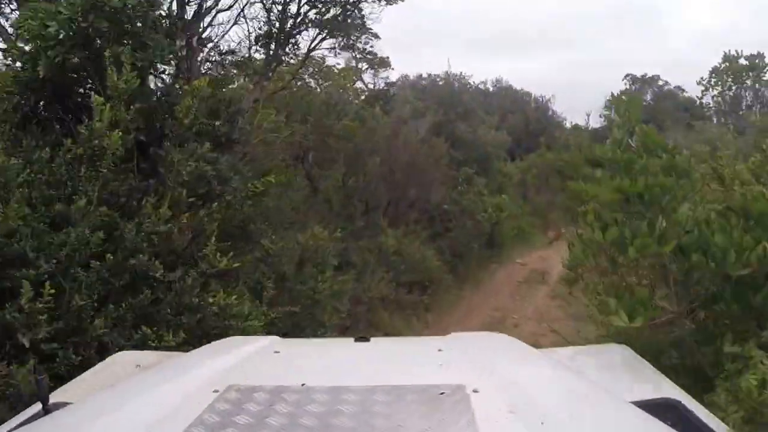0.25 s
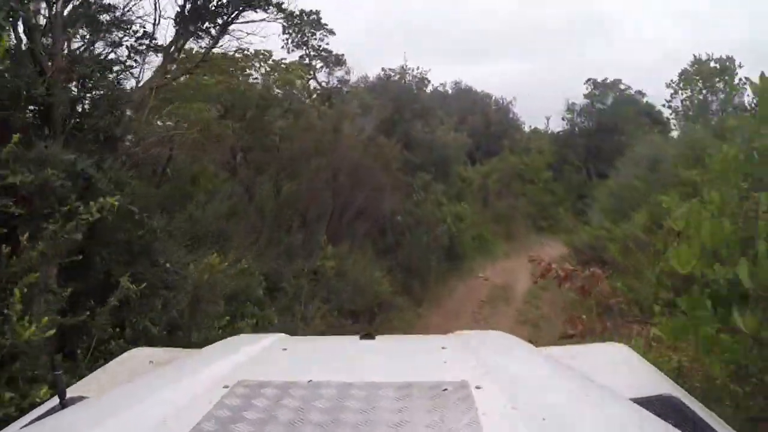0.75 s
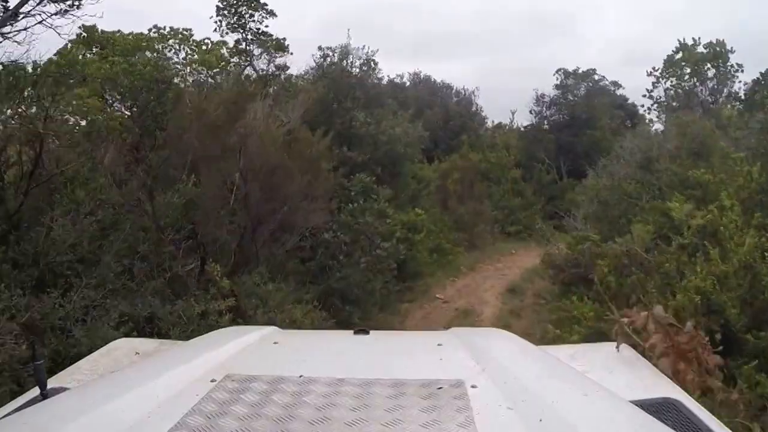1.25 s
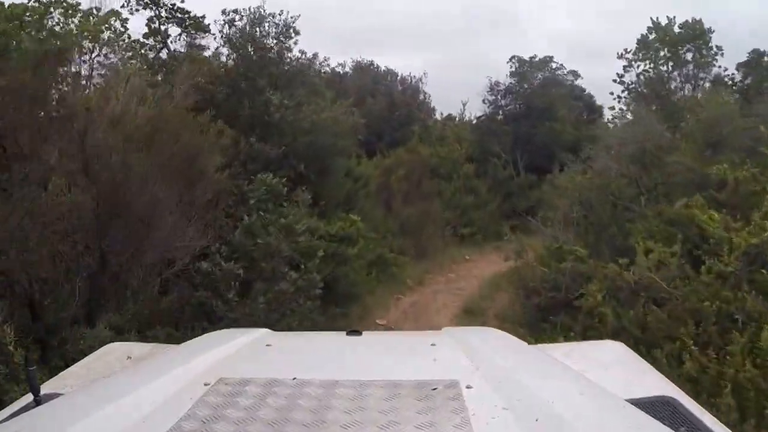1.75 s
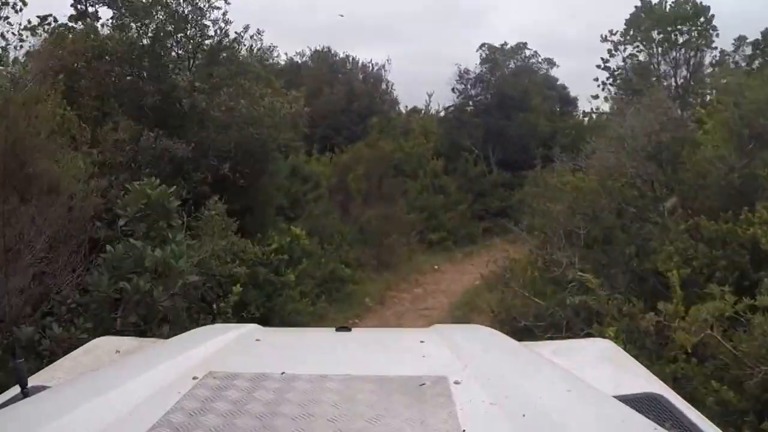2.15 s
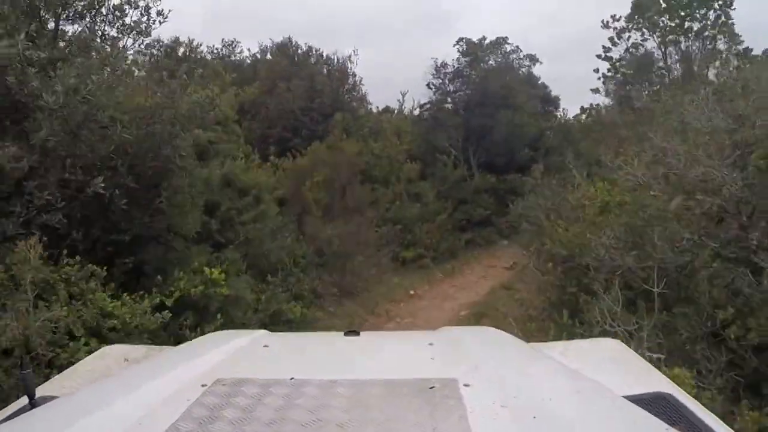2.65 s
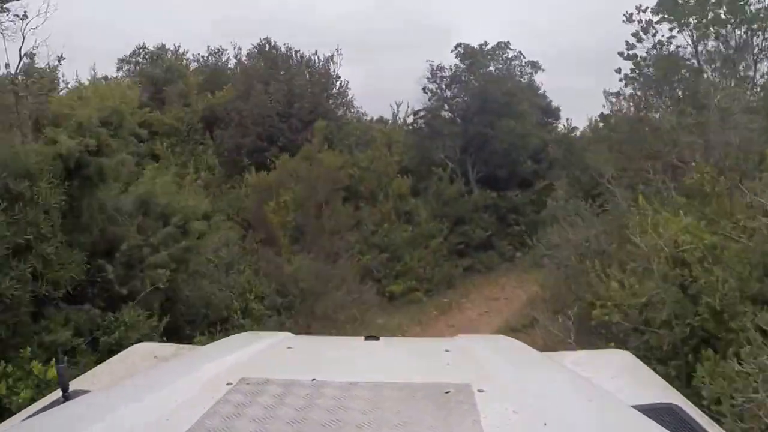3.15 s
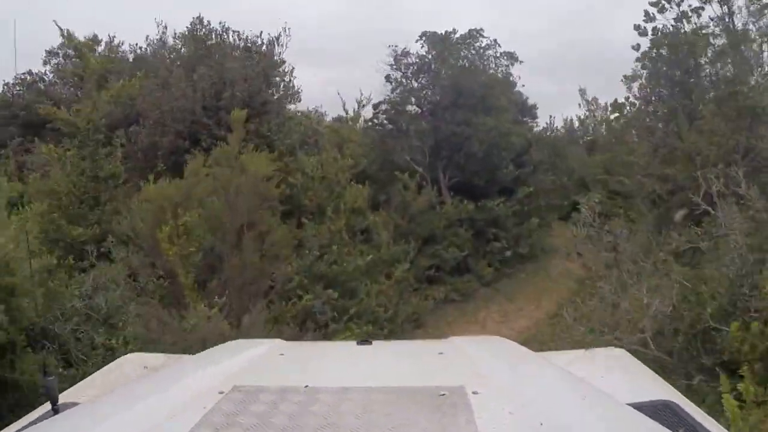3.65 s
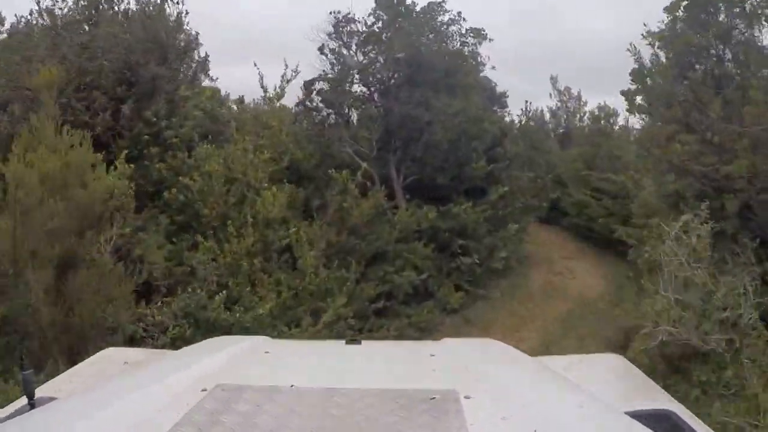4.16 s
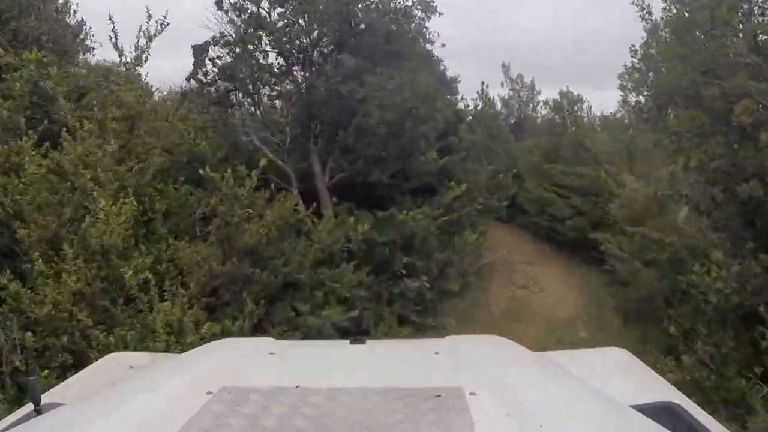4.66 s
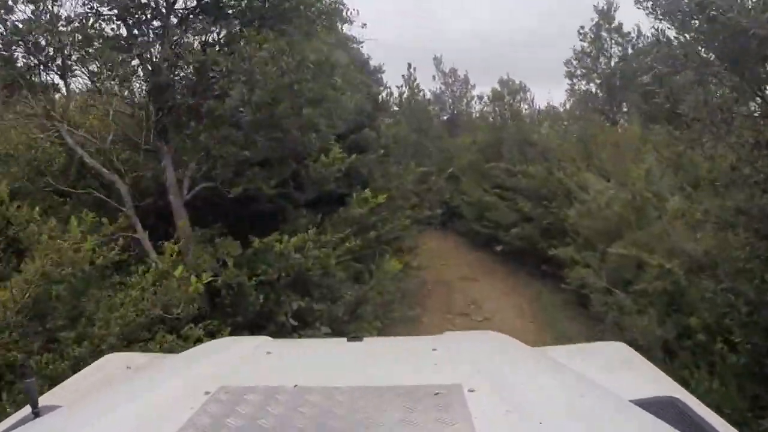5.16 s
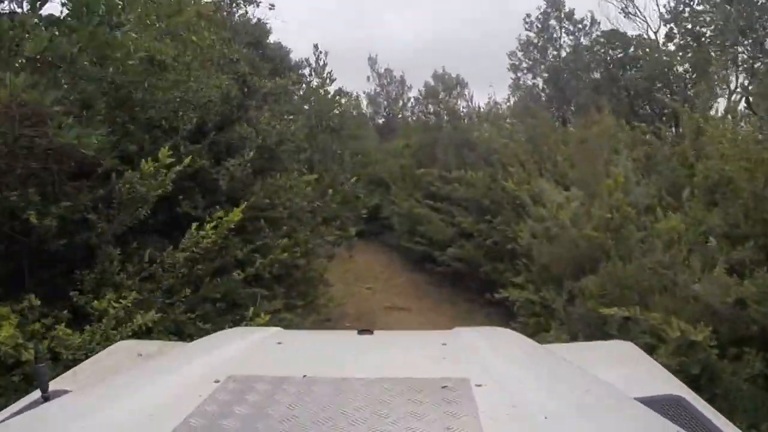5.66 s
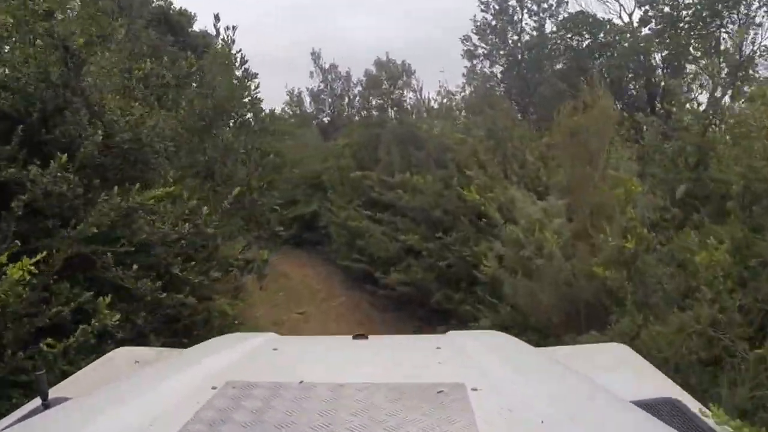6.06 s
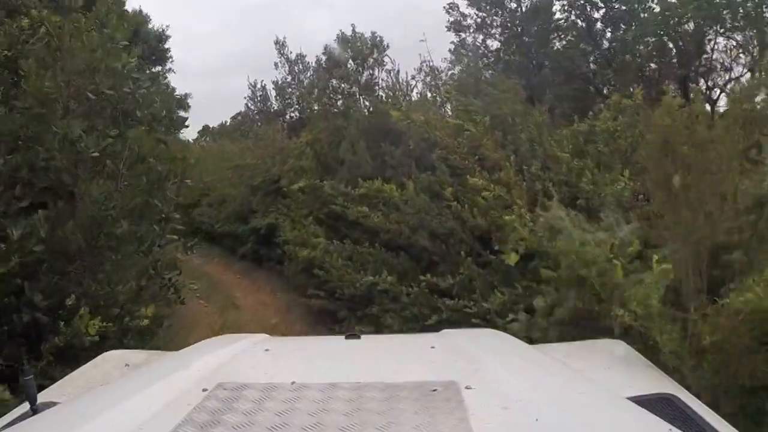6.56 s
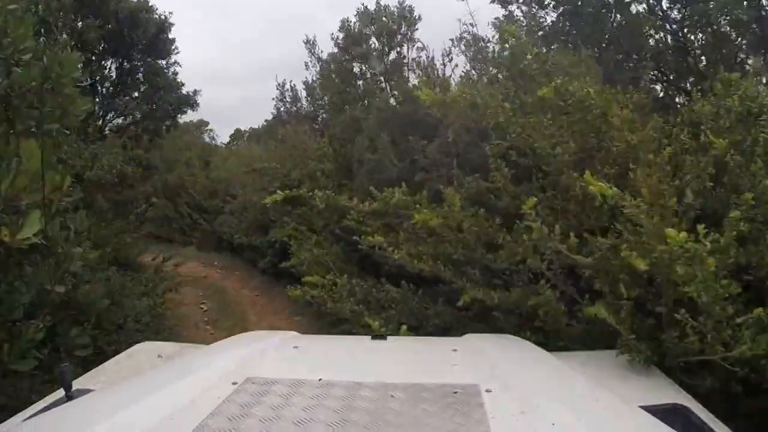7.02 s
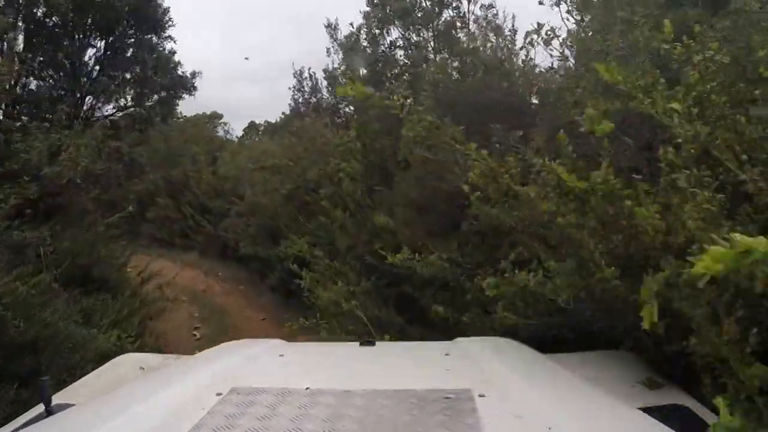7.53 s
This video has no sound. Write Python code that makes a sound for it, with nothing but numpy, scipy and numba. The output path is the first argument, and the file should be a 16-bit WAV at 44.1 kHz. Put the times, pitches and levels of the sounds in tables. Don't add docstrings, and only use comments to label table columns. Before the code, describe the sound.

Close, body-mounted sound of a diesel four-wheel-drive on an overgrown dirt track. A low engine hum and rumbling, rattling frame continue throughout. Dense twig cracks, hollow panel booms and dry scrapes crowd the first three seconds, then lighter brushing, tiny squeaks and a strong cluster of hits near 4.6 to 5 seconds. It becomes sparser, with a last leafy flurry just after seven seconds.

```python
import sys
import numpy as np
from scipy import signal
from scipy.io import wavfile
from scipy.ndimage import uniform_filter1d
from numba import njit

SR = 44100
rng = np.random.default_rng(int(sys.argv[2]) if len(sys.argv) > 2 else 0)


def int16_out(signal):
    q = np.round(np.clip(np.atleast_2d(signal).T, -1, 1) * 32767)
    wavfile.write(sys.argv[1], SR, q.astype(np.int16))


def volts(x):
    e = np.asarray(x, float) / 20
    return 10 ** e


N = 343539


@njit
def svf(x, hz, width):
    y, band, low = np.empty(len(x)), 0., 0.
    g, k = np.tan(np.pi * hz / SR), width / hz
    for i in range(len(x)):
        v = (band + g * (x[i] - low)) / (1 + g * (g + k))
        band, low, y[i] = 2 * v - band, low + 2 * g * v, k * v
    return y


def steep(x, hz, width):
    return svf(svf(x, 1. * hz, 1. * width), 1. * hz, 1. * width)


def unit(x):
    return x / np.sqrt(np.mean(x ** 2))


def body(x, modes):
    total = np.zeros(len(x))
    for k, (hz, width, level_db) in enumerate(modes):
        total += volts(level_db) * steep(x, hz, 1.48 * width) * (-1) ** k
    return unit(total)


def columns(table):
    s, *rest = np.transpose(table)
    return [np.interp(np.arange(N) / SR, s, c) for c in rest]


def walk(rate):
    hold = int(SR / rate)
    steps = np.repeat(rng.standard_normal(N // hold + 1), hold)
    return 1.42 * uniform_filter1d(uniform_filter1d(steps, hold), hold)[:N]


def grains(rate, spread_db, tail_s, bed_db):
    sizes_db = np.minimum(spread_db * rng.exponential(size=N), 17)
    hits = (rng.random(N) < rate / SR) * volts(sizes_db)
    scrape = signal.lfilter([1], [1, -np.exp(-1 / (tail_s * SR))], hits)
    return rng.standard_normal(N) * (unit(scrape) + volts(bed_db))


def flecks(count, low_hz, high_hz, cycles):
    out = np.zeros(N)
    for when, pitch, size, bend in rng.random((count, 4)):
        hz = low_hz * (high_hz / low_hz) ** pitch
        turn = np.arange(int(4 * cycles * SR / hz)) * hz / SR
        ring = np.sin(2 * np.pi * turn * (1 + .02 * (bend - .5) * turn / cycles))
        envelope = (1 - np.exp(-turn / 3)) * np.exp(-turn / cycles)
        add(out, when * N / SR, volts(18.0 * size) * envelope * ring)
    return unit(out)


def add(out, s, x):
    i = int(s * SR)
    out[i:i + len(x)] += x[:N - i]


def engine():
    # time_s, firing_hz, level_db
    firing = [(0.0, 31.8, -18), (0.78, 33.2, -19), (1.06, 42.96, -14), (1.34, 45.6, -14.5),
              (1.5, 43.97, -24), (1.74, 43.95, -13), (1.89, 48.4, -23), (2.08, 45.8, -25),
              (2.21, 46.22, -16), (2.91, 49.35, -22), (4.56, 52.06, -21), (4.69, 55.03, -20.5),
              (6.44, 49.9, -21), (6.81, 45.37, -18.5), (7.29, 49.56, -24), (7.79, 45.43, -30)]
    hz, db = columns(firing)
    octave_db = -27.5 + 0.51 * (db - db.mean())
    octave_db = octave_db + 1.1 * np.minimum(hz - 47.5, 0)
    phase = 2 * np.pi * np.cumsum(hz * (1 + 0.026 * walk(12))) / SR
    tone = volts(db + 0.5 + 2.5 * walk(13)) * np.sin(phase)
    octave = volts(octave_db - 1.5 + 3.05 * walk(16)) * np.sin(2 * phase)
    return np.sqrt(2) * (tone + octave)


def ride():
    # time_s, level_db
    roughness = [(0, -17.5), (.2, -24.5), (.75, -24.5), (1.15, -23), (1.86, -25.5), (1.98, -30),
                 (2.45, -26.5), (2.67, -33), (2.9, -25), (3.2, -35.5), (3.47, -28.5), (4.0, -29),
                 (4.58, -25), (5.1, -28.5), (5.75, -26), (6.1, -28), (7.3, -27.5), (7.79, -34.5)]
    # time_s, level_db
    sway = [(0.0, -37), (0.13, -23), (1.41, -28), (2.43, -17), (3.32, -32), (3.36, -21.5), (4.86, -16),
            (4.95, -23.5), (5.34, -9), (5.68, -24.5), (6.62, -18), (6.7, -22), (7.72, -21), (7.79, -45)]
    # pitch_hz, width_hz, level_db
    frame_modes = [(20.56, 8.7, 2), (27, 18.4, -7.5)]
    floor_modes = [(100.4, 36, -2.5), (140.5, 23.4, -1.5), (185.3, 42.8, -6)]
    door_modes = [(213, 46, -6), (298, 44.6, 0), (365.3, 67.4, -3.5), (491, 97, -12)]
    crunch_modes = [(650, 114, 2), (878, 148, -1.5), (1300, 430, -4)]
    (rough_db,), (heave_db,) = columns(roughness), columns(sway)
    excess_db = rough_db - rough_db.mean()
    jolts = grains(160, 1.2, tail_s=.012, bed_db=3)
    stones = grains(250, 3.6, tail_s=0.016, bed_db=2.0)
    frame = volts(heave_db + 2.5) * body(rng.standard_normal(N), frame_modes)
    axle_hop = unit(steep(rng.standard_normal(N), 55.8, 18.0))
    axle_hop = volts(-23 + 0.43 * excess_db + 1.8 * walk(3.07)) * axle_hop
    rattle = volts(-6) * flecks(count=900, low_hz=430, high_hz=1300, cycles=9)
    floor = volts(-25.5 + excess_db) * body(jolts, floor_modes)
    doors = volts(rough_db) * body(jolts, door_modes)
    tyres = volts(rough_db - 7.5) * (body(stones, crunch_modes) + rattle)
    return frame + axle_hop + floor + doors + tyres


def thumps():
    # start_s, peak_db, pitch_hz, t60_s
    booms = [(0.17, -3.5, 302, 0.22), (0.354, -2, 123, 0.104), (1.485, 3, 116, 0.16),
             (1.827, -1.5, 151, 0.1), (1.845, -0.5, 111, 0.24), (2.295, -1, 130, 0.098),
             (2.349, -5, 316, 0.095), (2.5, -2.5, 135, 0.088), (2.73, -7, 305, 0.08),
             (2.819, -8.5, 320, 0.15), (2.859, -10, 380, 0.19), (2.896, 2.5, 339, 0.1),
             (2.958, -7, 378, 0.11), (1.15, -8.5, 270, .15), (2.33, -7, 213, 0.17), (2.505, -5.5, 310, 0.1),
             (5.9, -7.5, 96, .2), (4.62, -5, 140, 0.16), (1.828, -6.5, 340, 0.086),
             (0.356, -6.5, 310, 0.16), (4.66, -5, 330, 0.093), (4.205, -4, 300, .08), (.63, -7, 83, 0.18),
             (6.41, -7, 98, 0.29), (5.52, -8.5, 134, 0.16), (7.29, -10, 155, 0.128), (4.161, -9, 293, 0.35),
             (4.62, -7, 346, 0.1), (.02, -4, 71.4, 0.26), (2.15, -6, 166, .12), (.975, -7, 150, 0.11),
             (2.922, -5, 348, 0.07), (.815, -8, 336, 0.095), (6.3, -9, 150, 0.16)]
    out, t = np.zeros(N), np.arange(int(.3 * SR)) / SR
    for s, db, hz, t60 in booms:
        envelope = (1 - np.exp(-t * hz / 0.61)) * 1000 ** (-t / max(t60, .02))
        add(out, s, volts(db - 2.5) * envelope * np.sin(2 * np.pi * hz * t * (1 - 0.23 * t)))
    return out


def knocks():
    # start_s, peak_db, pitch_hz, t60_s
    raps = [
        (1.561, -6.5, 484, 0.092),
        (1.597, -15.5, 470, 0.52),
        (4.179, -19, 510, 0.17),
        (4.933, -10, 484, 0.14),
        (5.209, -24, 963, 0.086),
        (5.514, -12.5, 726, 0.07),
    ]
    out, t = np.zeros(N), np.arange(int(.2 * SR)) / SR
    for s, db, hz, t60 in raps:
        rap = rng.standard_normal(len(t)) * (1 - np.exp(-t / 0.0015)) * 1000 ** (-t / max(t60, .02))
        ring = steep(rap, hz, 150.0) + volts(-7.0) * steep(rap, 1.1 * hz, 840.0)
        add(out, s, volts(db + 12.5) * ring)
    return out


def slaps():
    # start_s, peak_db, ring_hz, t60_s
    twig_hits = [(.0338, -10, 1680, 0.051), (.081, -3.5, 2010, 0.044), (.2104, -7.5, 1440, .054),
                 (.5285, -13.5, 2870, .12), (.7294, -6.5, 2100, 0.04), (1.3428, -12.5, 3100, 0.14),
                 (1.4155, -14, 3040, .07), (1.824, -14.5, 1300, 0.16), (2.1973, -7, 2950, 0.043),
                 (2.7925, -22, 2170, 0.17), (5.1395, -22, 2630, 0.049), (5.241, -17, 1280, 0.14),
                 (5.3167, -27, 3064, .047), (6.1832, -28, 2620, 0.12), (6.2735, -15, 2210, .047),
                 (7.079, -24, 2000, 0.046), (7.2344, -15, 4320, 0.11), (7.258, -18, 4600, .05),
                 (7.2664, -12.5, 3400, 0.094), (7.4145, -16, 3590, 0.077), (7.439, -13, 5200, 0.063),
                 (7.6343, -22, 2290, 0.059), (7.658, -19, 2735, 0.082)]
    # start_s, peak_db, ring_hz, t60_s
    leaf_hits = [(.1039, -21, 1630, 0.099), (.2755, -11, 1900, 0.06), (.3096, -13, 5200, 0.065),
                 (.584, -9, 1350, 0.071), (.9054, -10, 2470, .16), (.9634, -15, 1410, 0.072),
                 (2.1333, -11.5, 2320, 0.13), (2.175, -8, 1410, 0.036), (2.6473, -31, 2970, 0.11),
                 (3.6276, -11, 1650, 0.13), (3.674, -17, 4300, .06), (3.765, -11, 5700, 0.07),
                 (3.8546, -17, 2880, 0.11), (4.612, -19, 2944, 0.46), (4.645, -7, 2780, 0.066),
                 (4.7047, -7.5, 4300, 0.17), (4.807, -16, 4500, 0.066), (5.0596, -15, 2180, 0.089),
                 (5.7887, -14, 1529, 0.12), (5.8857, -14, 1940, 0.1), (6.0771, -20, 1520, 0.056),
                 (7.1957, -8, 2820, 0.11)]
    # start_s, peak_db, ring_hz, t60_s
    bough_hits = [(.167, -20.5, 1430, 0.12), (.4535, -11, 1550, 0.025), (.638, -19.5, 1440, 0.063),
                  (.6654, -21, 1360, .052), (1.135, -24, 2430, .07), (1.2204, -26, 1760, 0.062),
                  (1.5429, -23, 1444, 0.09), (1.57, -17, 2750, 0.076), (1.678, -22.5, 1390, .076),
                  (1.868, -26, 1350, 0.049), (2.0278, -26, 2650, 0.24), (2.4857, -30, 1460, 0.24),
                  (2.5318, -28, 1350, 0.11), (2.7459, -32, 2760, 0.13), (2.859, -29, 1890, 0.11),
                  (3.056, -27, 2795, 0.11), (3.0773, -21, 2693, 0.17), (3.5897, -28, 1310, .09),
                  (3.9868, -29, 1300, 0.11), (4.8374, -23, 1310, 0.07), (4.9308, -14, 2940, 0.15),
                  (5.867, -26, 1480, .078)]
    out, t = np.zeros(N), np.arange(int(.25 * SR)) / SR
    kinds = [(twig_hits, -37, -17.5), (leaf_hits, -18, -17), (bough_hits, -16, -4)]
    for rows, treble_db, thud_db in kinds:
        for s, db, hz, t60 in rows:
            noise = rng.standard_normal((2, len(t)))
            ragged = volts(2.1 * unit(uniform_filter1d(noise[1], size=90)))
            envelope = ragged * 1000 ** (-t / max(t60, .01)) + 0.38 * np.exp(-t / 0.0014)
            blow = noise[0] * envelope * (1 - np.exp(-t / 0.00073))
            crack = steep(steep(blow, 2650.0, 7300.0), 2440.0, 6400.0)
            ring = volts(3.0) * steep(blow, hz, .55 * hz)
            hiss = volts(treble_db + 7.0) * steep(blow, 9250.0, 5700.0)
            thin_db = -4.5 * np.log2(hz / 2000)
            thud = volts(thud_db + 24.0 + thin_db) * steep(blow, 870.0, 1080.0)
            add(out, s, volts(db - 6.0) * (crack + ring + hiss + thud))
    return out


def scrapes():
    # start_s, length_s, level_db, pitch_hz
    rasps = [(0, 0.012, -15.5, 1300), (.008, .025, -21, 680), (.34, 0.02, -24, 705), (.375, .05, -32, 2300),
             (.38, .02, -23, 690), (.5, 0.032, -26, 900), (1.45, 0.067, -27, 930), (1.59, .06, -27, 800),
             (1.68, 0.049, -30, 850), (2.74, .03, -28.5, 895), (2.85, 0.033, -28, 900),
             (3.05, 0.087, -29, 950), (4.02, 0.071, -38, 3500), (4.125, .14, -46, 10900),
             (4.6, 0.078, -26, 700), (4.702, 0.032, -24, 2600), (4.935, 0.038, -22, 800),
             (5.51, 0.03, -29.5, 990), (5.785, .03, -31, 1100), (5.845, 0.057, -32, 1000),
             (6.2, 0.11, -32.5, 1200), (6.44, 0.047, -33.5, 1200), (6.52, 0.047, -33, 1100),
             (7.19, 0.034, -23.5, 800), (7.41, 0.019, -31, 650), (7.45, 0.021, -30, 660)]
    # start_s, length_s, level_db, pitch_hz
    chirrs = [(.53, .035, -27, 2900), (.722, 0.022, -24.5, 2900), (1.215, 0.046, -37, 1750),
              (1.22, .04, -39, 3600), (1.355, .03, -32, 3000), (1.405, 0.033, -32, 4100),
              (1.412, .035, -31, 3040), (1.44, .022, -34, 4700), (1.45, .025, -32, 2200),
              (1.82, .025, -28, 1300), (2.772, .012, -34, 1500), (2.862, .025, -36, 1900),
              (3.055, 0.046, -33, 2840), (3.59, .02, -30, 1320), (3.69, .03, -38, 2900),
              (4.02, .03, -49, 6900), (4.15, .05, -43, 6200), (4.225, .045, -52, 11300),
              (4.22, .035, -46, 6800), (4.75, .012, -29, 1090), (4.98, 0.014, -28, 2200),
              (4.99, .016, -33, 2600), (5.01, .016, -31, 2500), (5.085, 0.031, -36, 2830),
              (5.24, .015, -28, 1339), (5.42, .022, -37, 2460), (5.45, .035, -40, 3500),
              (5.61, 0.036, -43, 4000), (5.775, 0.019, -37, 2800), (6.065, .025, -32, 1522),
              (7.27, 0.02, -34, 1400), (7.655, 0.014, -37, 1350), (.47, .025, -38, 7900),
              (.545, .025, -33, 5000), (.575, .025, -46, 8900), (.975, .03, -42, 7050),
              (2.53, 0.039, -29, 617), (3.0, 0.032, -28.5, 512), (3.56, .02, -50, 9200),
              (3.7, 0.028, -50, 8600), (4.06, .04, -50, 7800), (.688, 0.018, -30, 2500),
              (5.205, .02, -29.5, 950)]
    # start_s, length_s, level_db, pitch_hz
    ticks = [(.034, .02, -22, 1700), (.646, 0.014, -22, 2400), (.729, 0.016, -18.5, 1800),
             (.8, .01, -33, 2000), (1.826, .012, -30, 2800), (1.868, .01, -30.5, 2600),
             (2.309, 0.014, -28, 1000), (2.792, .012, -27, 2100), (2.818, 0.0091, -32, 2200),
             (2.843, 0.013, -30, 2100), (3.001, .015, -32, 800), (.102, .012, -23, 2000),
             (4.785, .012, -33, 5500), (4.93, .015, -19.5, 2210), (5.139, .015, -27, 2800),
             (5.317, .012, -29, 2900), (5.822, .008, -34, 3800), (6.183, .01, -29, 2700),
             (6.274, .01, -30, 2100), (7.078, .012, -28.5, 1000), (7.195, 0.0089, -27, 2500),
             (7.634, 0.0098, -27, 1900)]
    # start_s, length_s, level_db, pitch_hz
    lashes = [(.115, .025, -33, 9000), (.044, .012, -25, 2500), (.276, .012, -31, 11000),
              (.72, 0.0093, -35, 7000), (2.175, .012, -28, 5500), (2.197, 0.011, -30, 5500),
              (2.217, .014, -27, 2200), (2.262, .015, -37, 5000), (2.318, .025, -40, 5500),
              (2.343, .02, -35, 2800), (2.487, .025, -38, 4000), (4.705, .03, -29, 6000),
              (4.696, .006, -31, 6500), (5.79, 0.027, -34, 6500), (5.82, .012, -38, 7500),
              (6.062, .03, -44, 9000), (5.872, .014, -36, 5500), (3.624, .012, -29, 4000),
              (7.195, 0.018, -26, 6960), (7.23, .02, -34, 6000), (7.49, 0.011, -44, 6000)]
    # start_s, length_s, level_db, pitch_hz
    more_rasps = [
        (.62, 0.068, -27, 2200),
        (2.31, 0.07, -29, 800),
        (1.1, 0.042, -24.5, 650),
        (4.148, 0.075, -26, 650),
        (5.5, .05, -25, 481),
        (6.798, 0.035, -30, 750),
    ]
    out = np.zeros(N)
    kinds = [(rasps, .6, 0.91, 0), (chirrs, .1, .8, 0), (ticks, 0.49, 0.31, 10),
             (lashes, 0.67, 0.38, 0), (more_rasps, .6, 0.91, 0)]
    for rows, width, sudden, snap in kinds:
        for s, length, db, hz in rows:
            u = np.linspace(0, 1, int(length * SR))
            rub = rng.standard_normal(9000)
            rub[2030] += snap
            rub = steep(rub, hz, width * hz)[2000:2000 + len(u)]
            add(out, s, volts(db) * unit(rub) * np.sin(np.pi * u ** sudden))
    return out


def squeaks():
    # start_s, length_s, pitch_hz, level_db
    loading = [(.529, 0.045, 2850, -30), (.954, 0.024, 1360, -26), (.959, .048, 6400, -38),
               (1.024, .057, 7030, -34), (1.057, .057, 7940, -42), (1.132, 0.029, 7090, -30.5),
               (1.379, .025, 2300, -28), (1.41, 0.038, 3010, -34), (5.256, .02, 1930, -28),
               (5.493, .03, 2900, -35), (5.752, 0.026, 3115, -38), (6.397, 0.034, 3520, -43),
               (6.94, .06, 11950, -56)]
    # start_s, length_s, pitch_hz, level_db
    sliding = [(.044, .078, 10700, -53), (.879, 0.029, 4680, -33), (1.337, 0.022, 3060, -22),
               (3.565, .074, 4377, -46), (3.69, 0.034, 4500, -40), (3.57, .04, 8650, -59),
               (3.86, .022, 7320, -53), (4.054, 0.072, 12600, -49), (4.02, 0.042, 7000, -49),
               (4.126, .03, 4430, -34), (4.135, 0.03, 11300, -48), (4.435, 0.032, 7800, -44),
               (4.9, .19, 13210, -51), (4.99, .015, 4034, -29), (5.11, .016, 2500, -30),
               (5.445, .022, 1702, -32), (6.127, .06, 3596, -44), (6.68, 0.045, 10920, -51),
               (6.877, .013, 7560, -41), (7.15, .015, 3630, -35)]
    # start_s, length_s, pitch_hz, level_db
    stiff = [
        (4.196, 0.036, 4400, -34),
        (4.236, 0.016, 4550, -43),
    ]
    out, flutter_db = np.zeros(N), 4
    kinds = [(loading, 0.91, -28), (sliding, -0.27, -27), (stiff, -.35, -4.5)]
    for rows, glide, over_db in kinds:
        for s, length, start_hz, db in rows:
            u = np.linspace(0, 1, int(length * SR))
            wobble = unit(uniform_filter1d(rng.standard_normal((2, 9000)), size=90))[:, :len(u)]
            hz = start_hz * (1 + glide * length * u) * (1 + .013 * wobble[0])
            phase = 2 * np.pi * np.cumsum(hz) / SR
            overtones = (np.sin(2 * phase) + .5 * np.sin(3 * phase)) * (start_hz < SR / 8)
            envelope = volts(db + flutter_db * wobble[1]) * np.sin(np.pi * u ** 0.69) ** 0.56
            add(out, s, envelope * (np.sin(phase) + volts(over_db) * overtones))
    return out


def pressure():
    # time_s, level_db
    lean = [(0.0, -22.5), (0.15, -31), (0.63, -27), (1.06, -33), (1.45, -31), (1.8, -38), (2.08, -41),
            (2.3, -39.5), (2.95, -48), (3.08, -54), (3.36, -45.5), (3.64, -38), (4.51, -37), (4.84, -33.5),
            (5.21, -36), (6.51, -42), (7.16, -37), (7.79, -46)]
    # centre_s, half_length_s, level_db
    swishes = [(0.124, 0.018, -23.5), (0.55, 0.011, -39), (0.591, 0.014, -29), (2.243, 0.016, -38),
               (2.35, 0.015, -45), (2.539, 0.029, -40), (2.87, 0.02, -37.5), (3.02, 0.025, -43),
               (3.455, 0.016, -45), (3.541, 0.0084, -40), (4.556, 0.024, -40.5), (4.924, 0.011, -32),
               (5.102, .025, -37), (5.144, .01, -44), (5.27, .018, -47), (5.582, 0.017, -47),
               (6.322, .0055, -38), (6.455, 0.015, -42), (6.533, 0.054, -46.5), (6.646, 0.0043, -39),
               (7.093, .007, -36),
               (0.407, 0.047, -36.5), (1.213, 0.028, -44), (1.43, 0.06, -32), (2.2, 0.091, -42),
              (2.42, 0.069, -43.5), (2.665, 0.044, -36), (2.762, 0.03, -29.5), (3.084, 0.052, -28.5),
              (3.643, 0.1, -42), (4.065, 0.083, -43), (4.73, 0.038, -27.5), (5.626, 0.1, -46),
              (5.801, 0.041, -35.5), (6.248, 0.063, -50), (7.24, .03, -40), (7.432, .043, -31.5)]
    swell = np.zeros(N)
    for s, half, db in swishes:
        add(swell, s - half, volts(db) * np.bartlett(int(2 * half * SR)) ** 0.97)
    return volts(columns(lean)[0] - 2.0), swell


def brush():
    # pitch_hz, width_hz, level_db
    patches = [(1750, 2260, 0.5), (2300, 1550, 4), (2930, 380, 1), (3800, 3200, -1.5), (6530, 380, -13)]
    drag, swell = pressure()
    sweep = grains(110, 3.8, tail_s=.002, bed_db=1) * volts(2.2 * walk(25))
    twigs = np.zeros(N)
    for hz, width, level_db in patches:
        own = grains(70, 4.0, tail_s=.008, bed_db=0)
        twigs += volts(level_db) * steep(sweep + 2.55 * own, hz, 1.31 * width)
    tips = volts(-10) * flecks(count=500, low_hz=1600, high_hz=5000, cycles=18)
    leaf_patter = grains(70, 4.0, tail_s=.008, bed_db=0)
    leaves = unit(steep(sweep + 1.3 * leaf_patter, 4600.0, 8700.0))
    leaf_force = volts(-12) * drag + volts(-7) * swell
    rustle = volts(-60.0) * unit(svf(rng.standard_normal(N), 3400.0, 7000.0))
    return (drag + swell) * (unit(twigs) + tips) + leaf_force * leaves + rustle


def scene():
    vehicle = engine() + ride()
    blows = thumps() + knocks() + slaps()
    rubbing = brush() + squeaks() + scrapes()
    return (vehicle + blows + rubbing)[None]


def mute_top(x):
    # lower_edge_hz, threshold_db
    gates = [(14650, -69), (13850, -79)]
    for hz, db in gates:
        high_pass = signal.ellip(6, .05, 60, hz, "high", fs=SR, output="sos")
        top = signal.sosfiltfilt(high_pass, x)
        faint = uniform_filter1d(top ** 2, size=1024) < volts(2 * db)
        x = x - top * uniform_filter1d(1. * faint, size=512)
    return x


def roll_off(x):
    return signal.sosfilt(signal.butter(12, 15400, fs=SR, output="sos"), x)


def record(dry):
    dull = signal.sosfilt(signal.ellip(12, .1, 80, 15150, fs=SR, output="sos"), dry)
    dull = dull * np.minimum((N - np.arange(N)) / 150, 1)
    rounded = np.tanh(0.59 * dull) / 0.6
    return roll_off(mute_top(rounded))


dry = scene()
out = record(dry)
int16_out(out)
```